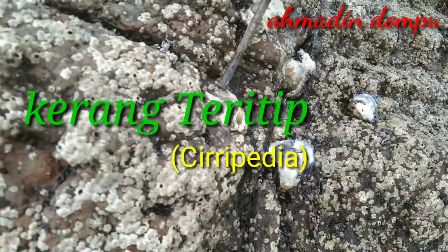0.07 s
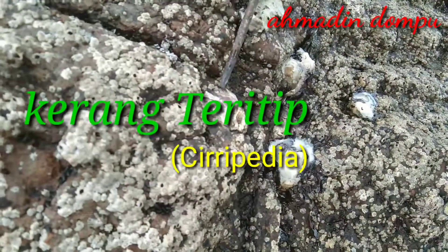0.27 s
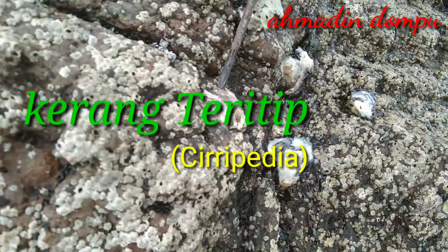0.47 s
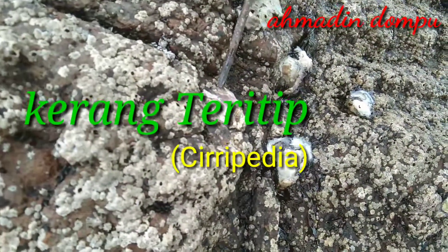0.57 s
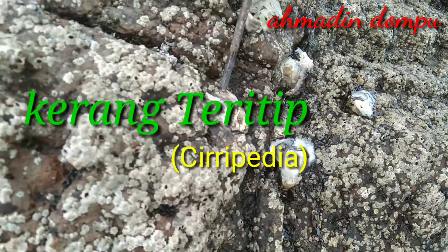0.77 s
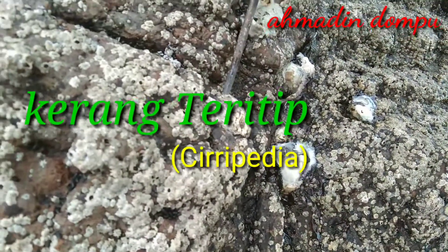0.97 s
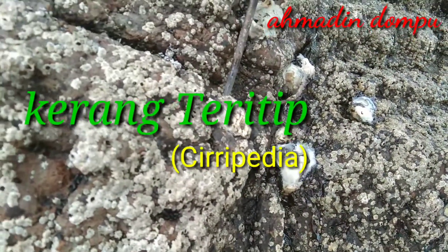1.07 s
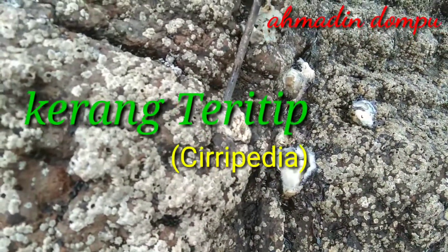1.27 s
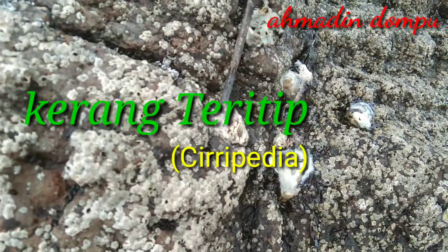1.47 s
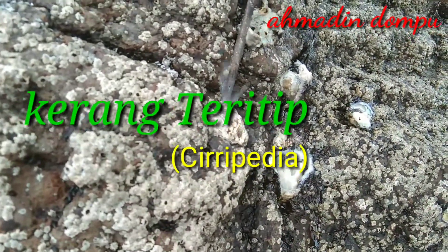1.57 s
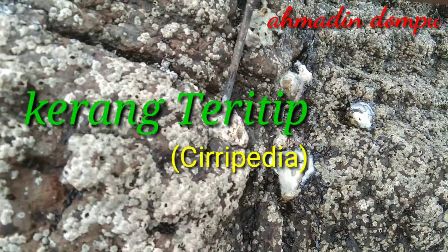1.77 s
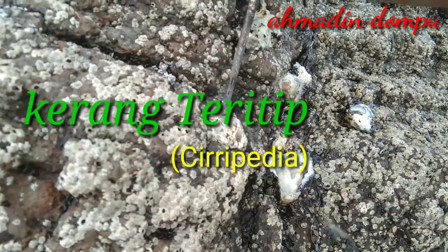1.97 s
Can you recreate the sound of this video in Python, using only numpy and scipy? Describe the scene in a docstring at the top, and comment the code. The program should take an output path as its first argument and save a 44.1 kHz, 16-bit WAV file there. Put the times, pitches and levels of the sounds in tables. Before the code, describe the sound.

Six evenly paced, sharp cracks sound close up as a screwdriver chips barnacles on a rock, with short metallic rings, tiny falling chips and soft handling bumps. The sea hisses and rumbles behind, louder at first, then faint.

```python
"""Jabbing barnacles on the shore

On a shore rock, close to the microphone, a steel screwdriver is jabbed six times into barnacles. Each jab
crushes shell for a few milliseconds, knocks and thumps on the rock and briefly rings the shaft; small chips
tick down and the handling bumps softly. Farther off is the wash of the sea with a low rumble; the background
drops sharply at the first blow and sinks further after the next ones."""
import sys
import numpy as np
from scipy import signal
from scipy.fft import rfft, irfft, next_fast_len
from scipy.io import wavfile
from scipy.ndimage import uniform_filter1d

SR = 44100
rng = np.random.default_rng(int(sys.argv[2]) if len(sys.argv) > 2 else 0)


def persist_wave(psi):
    """Save psi, clipped to +-1, as 16-bit WAV."""
    counts = np.round(np.clip(psi, -1, 1) * 32767).astype(np.int16)
    wavfile.write(sys.argv[1], SR, np.atleast_2d(counts).T)


N = 89258
TIME = np.arange(N) / SR
BLOW_TIME = TIME[:SR // 5]   # seconds within one blow


def from_db(db):
    """Decibels to gain."""
    return 10 ** (np.asarray(db) / 20)


def level(rows):
    """Gain over time from (s, dB) points."""
    return from_db(np.interp(TIME, *np.transpose(rows)))


def add(out, start_s, sound):
    """Mix a sound in at its start time."""
    i = int(start_s * SR)
    out[i:i + len(sound)] += sound[:N - i]


def butter(x, order, hz, kind="low"):
    """Butterworth filter."""
    return signal.sosfilt(signal.butter(order, hz, kind, fs=SR, output="sos"), x)


def colour(x, points):
    """Causal filter with the given (Hz, dB) shape; white noise keeps its power."""
    size = 2 * next_fast_len(len(x))
    hz, db = np.transpose(points)
    bin_hz = np.arange(size // 2 + 1) * SR / size
    gain = from_db(np.interp(np.log(bin_hz + 1), np.log(hz), db))
    cepstrum = irfft(np.log(gain / np.sqrt(np.mean(gain ** 2))))
    cepstrum[1:size // 2] *= 2   # fold to minimum phase
    cepstrum[size // 2 + 1:] = 0
    return irfft(rfft(x, size) * np.exp(rfft(cepstrum)))[:len(x)]


def flutter(top_hz, samples):
    """Random wobble of spread 1."""
    wobble = butter(rng.standard_normal(samples), 2, top_hz)
    return wobble / wobble.std()


def thud(hz, t60, contact_hz):
    """A damped swing, its treble dulled by a soft contact."""
    swing = np.cos(2 * np.pi * hz * BLOW_TIME) * from_db(-60 * BLOW_TIME / t60)
    return butter(swing, 2, contact_hz)


# The sea, well behind the rock. Each row: time in seconds, level in dB.
SEA_LEVELS = [(0, -30.5), (.2, -31.5), (.372, -30.5), (.392, -44.5), (.67, -43.5), (.70, -48.5), (.85, -47),
              (.96, -52), (1.0, -52.5), (1.14, -51.5), (1.26, -47), (1.4, -53), (1.58, -48), (1.7, -50),
              (1.82, -49.5), (1.88, -47.5), (2.02, -50)]
# Its tone at the microphone. Each row: frequency in Hz, level in dB.
SEA_SPECTRUM = [(150, -9.5), (300, 2), (550, 2), (950, -1), (1500, -3), (2400, -5), (3200, -5),
                (4100, -1.5), (5400, -9.5), (7000, -3.5), (7900, -6), (9000, -17.5), (11500, -28.5),
                (13000, -29), (15000, -25), (16000, -57)]
def sea_wash(flicker_db=1.5, flicker_hz=18.4):
    """The sea washes in a broad, flickering hiss."""
    hiss = colour(rng.standard_normal(N), SEA_SPECTRUM)
    flicker = from_db(flicker_db * flutter(flicker_hz, N))
    return level(SEA_LEVELS) * hiss * flicker


# The rumble under the sea. Each row: time in seconds, level in dB.
RUMBLE_LEVELS = [(0, -30), (.37, -37), (.42, -43), (.67, -44), (.8, -47), (1.12, -51), (1.27, -45),
                 (1.36, -47.5), (1.54, -45), (1.69, -52), (1.84, -39), (2.02, -51.5)]
# Its tone. Each row: frequency in Hz, level in dB.
RUMBLE_SPECTRUM = [(20, 1), (40, -23.5), (65, -2), (88, 0.5), (115, -2), (148, -2.5), (200, -10),
                   (320, -13), (700, -58.5)]
def rumble():
    """Deep noise that sinks and swells."""
    return level(RUMBLE_LEVELS) * colour(rng.standard_normal(N), RUMBLE_SPECTRUM)


# Handling, close by. Each row: start in seconds, level in dB, pitch in Hz, time to fall 60 dB in seconds.
HANDLING_BUMPS = [(0.1, -17, 202, 0.045), (0.328, -19, 140, 0.069), (1.021, -37, 260, 0.042),
                  (1.262, -32, 141, 0.15), (1.401, -32, 89, 0.035), (1.768, -29, 160, .025),
                  (1.811, -22, 227, 0.031), (1.837, -23.5, 177, 0.0084), (1.889, -32, 127, 0.033)]
def bumps():
    """Soft contacts of handling make dull, low thuds."""
    out = np.zeros(N)
    for start_s, db, hz, t60 in HANDLING_BUMPS:
        add(out, start_s, from_db(db) * thud(hz, t60, contact_hz=2 * hz))
    return out


# Small ticks on the rock near the microphone.
# Each row: start in seconds, level in dB, centre in Hz, width in octaves, decay in seconds.
CHIP_TICKS = [(.227, -24.5, 3200, 0.68, 0.0082), (0.247, -24, 3900, 0.61, 0.0057),
              (.584, -40.5, 4530, 1.3, .003), (0.756, -34, 6980, 0.15, 0.0033),
              (.842, -42.5, 3820, 0.54, .004), (0.886, -38.5, 7550, 0.35, .002),
              (0.9774, -15.5, 3710, 0.32, 0.001), (0.9777, -15, 6830, 0.17, 0.0016),
              (1.003, -41.5, 6250, 0.39, .003), (1.267, -43, 3500, 0.42, .006),
              (1.3395, -25, 4550, 1.1, .0016), (1.343, -37, 4900, 0.85, 0.0017),
              (1.648, -42, 4370, 0.32, .004), (1.914, -44, 3480, .5, .007), (1.951, -34, 4400, .4, 0.0031)]
def ticks():
    """Falling chips and light touches of the blade: tiny gritty bursts around one pitch."""
    out = np.zeros(N)
    for start_s, db, hz, octaves, decay_s in CHIP_TICKS:
        low_hz, high_hz = np.minimum(hz * 2 ** (np.array([-.5, .5]) * octaves), SR / 2 - 1)
        grit = rng.standard_normal(len(BLOW_TIME)) * np.exp(-BLOW_TIME / decay_s)
        grit *= np.sqrt(SR / 2 / (high_hz - low_hz))   # same power at any width
        add(out, start_s, from_db(db) * butter(grit, 3, [low_hz, high_hz], "band"))
    return out


# What the surrounding rocks send back to the microphone. Each row: frequency in Hz, level in dB.
ROCK_SPECTRUM = [(150, 4), (500, -4.5), (1200, -13), (2500, -9), (3500, -12), (4400, -4), (5700, -8),
                 (6600, -7), (7300, -3), (8600, -6.5), (12000, -21), (15000, -20)]
def rock_scatter(split_hz=8200, low_t60=0.058, high_t60=0.043):
    """The rocks scatter a short diffuse tail whose top treble dies sooner."""
    tail = 0
    for side, t60 in (("low", low_t60), ("high", high_t60)):
        noise = rng.standard_normal(len(BLOW_TIME)) * from_db(-60 * BLOW_TIME / t60)
        tail += butter(noise, 6, split_hz, side)
    return colour(tail, ROCK_SPECTRUM)


def crush(hold_s, crumble_s=0.0011, grain_db=2.5, even_over_hz=700):
    """Force of shell giving way: a dense run of tiny fractures that holds, then crumbles off."""
    n = len(BLOW_TIME)
    envelope = np.exp(-np.maximum(BLOW_TIME - hold_s, 0) / crumble_s)
    fractures = envelope * rng.choice([-1, 1], n) * from_db(grain_db * rng.standard_normal(n))
    spectrum = rfft(fractures)
    power = uniform_filter1d(np.abs(spectrum) ** 2, size=int(even_over_hz * n / SR))
    even_spectrum = spectrum * np.sqrt(np.sum(envelope ** 2) / power)
    return irfft(even_spectrum, n) * (BLOW_TIME < BLOW_TIME[-1] / 2)


def ring(force, hz, t60):
    """One mode driven by the force, at peak height 1."""
    radius, angle = from_db(-60 / (t60 * SR)), 2 * np.pi * hz / SR
    feedback = [1, -2 * radius * np.cos(angle), radius ** 2]
    mode = signal.lfilter([0, np.sin(angle)], feedback, force + 1e-18)
    return mode / np.abs(mode).max()


# The screwdriver's modes, heard close up.
# Each row: frequency in Hz, level in dB, time to fall 60 dB in seconds.
STEEL_MODES = [(2850, -38, 0.047), (4090, -32, 0.03), (4300, -33, 0.055), (5260, -46, 0.059),
               (6780, -35, 0.04), (6730, -24, 0.056), (7500, -33.5, 0.047), (7600, -33.5, 0.057),
               (9000, -45, 0.029), (14400, -49, .025)]
def shaft_ring(force, chatter_depth=0.86, chatter_hz=220, grip_detune=0.012):
    """Steel rings, damped by the hand and roughened as the blade chatters on the shell."""
    out = 0
    for hz, db, t60 in STEEL_MODES:
        chatter = (1 + chatter_depth * flutter(chatter_hz, len(force))) / np.hypot(1, chatter_depth)
        gripped_hz = hz * (1 + grip_detune * rng.standard_normal())   # grip and contact vary by jab
        out += from_db(db) * chatter * ring(force, gripped_hz, t60)
    return out


# Barnacle shell breaking at close range. Each row: frequency in Hz, level in dB.
CRACK_SPECTRUM = [(150, -10), (500, -5), (1000, -7.5), (1700, -6), (2500, -7), (4000, -3), (5400, -4.5),
                  (7200, 2.5), (8600, -7.5), (10000, -13.5), (12300, -27), (14600, -10.5), (16000, -37)]
def shell_crack(force, top_db, resonances, top_hz=10900, width_hz=293):
    """The crack, coloured by its sharpness and by the resonances (Hz, dB) of the shell that breaks."""
    crack_hz, crack_db = np.transpose(CRACK_SPECTRUM)
    hz = np.geomspace(crack_hz[0], crack_hz[-1], 200)
    db = np.interp(np.log(hz), np.log(crack_hz), crack_db)
    db += top_db / (1 + (top_hz / hz) ** 10)   # treble shelf
    for centre_hz, rise_db in resonances:
        db += rise_db * np.exp(-.5 * ((hz - centre_hz) / width_hz) ** 2)
    return colour(force, np.transpose([hz, db]))


# The jabs, right by the microphone. Each row: start and crushing time in seconds, crack level and
# top treble in dB, lower shell resonance in Hz and its rise in dB, the same for the upper one,
# knock pitch in Hz, its level in dB, its time to fall 60 dB in seconds, thump, ring and tail in dB.
BARNACLE_JABS = [(0.3773, 0.0051, -12.5, -6, 1450, 8.5, 2850, 6, 293, -18, 0.013, -11.5, 9.5, -21.5),
                 (.6794, 0.0048, -11, -1, 1550, 0, 4640, 2.5, 760, -5, 0.0092, -10, -1, -22),
                 (0.9669, .0032, -11, 1.5, 2480, 5.5, 4200, 9, 177, -7.5, 0.015, -15, -12, -23.5),
                 (1.3055, .0028, -10.5, -3, 2100, 8, 3580, 5.5, 766, -7, 0.0092, -13.5, 9, -25.5),
                 (1.6239, .0034, -10.5, 1, 1630, 6, 3434, 12, 426, -5.5, 0.0079, -34, 7, -23.5),
                 (1.9369, 0.0038, -9.5, -3.5, 2080, 9, 4070, 5.5, 746, -5.5, 0.0056, -22, -19, -22)]
def jabs():
    """The blade cracks shell and rings, knocks and thumps on the rock, and leaves a scattered tail."""
    out = np.zeros(N)
    for (start_s, crush_s, crack_db, top_db, low_hz, low_db, high_hz, high_db,
         knock_hz, knock_db, knock_t60, thump_db, ring_db, tail_db) in BARNACLE_JABS:
        force = crush(crush_s)
        crack = from_db(crack_db) * shell_crack(force, top_db, [(low_hz, low_db), (high_hz, high_db)])
        steel = from_db(ring_db) * shaft_ring(force)
        knock = from_db(knock_db) * thud(knock_hz, knock_t60, contact_hz=1120)
        thump = from_db(thump_db) * thud(hz=90.3, t60=0.043, contact_hz=510)
        add(out, start_s, crack + steel)
        add(out, start_s + 0.496 * crush_s, knock + thump)   # the blade meets rock mid-crush
        add(out, start_s + crush_s, from_db(tail_db) * rock_scatter())
    return out


def scene():
    """One microphone at the rock, with the sea behind."""
    return (jabs() + ticks() + bumps() + sea_wash() + rumble())[None]


def record(dry):
    """The recorder loses the deepest bass, rounds the peaks and cuts the top."""
    low_cut_hz, ceiling, high_cut_hz = 41, 0.74, 15400
    x = butter(dry, 2, low_cut_hz, "high")
    rounded = x / (1 + (x / ceiling) ** 4) ** .25
    return signal.sosfilt(signal.ellip(10, .1, 80, high_cut_hz, fs=SR, output="sos"), rounded)


dry = scene()
out = record(dry)
persist_wave(out)
```